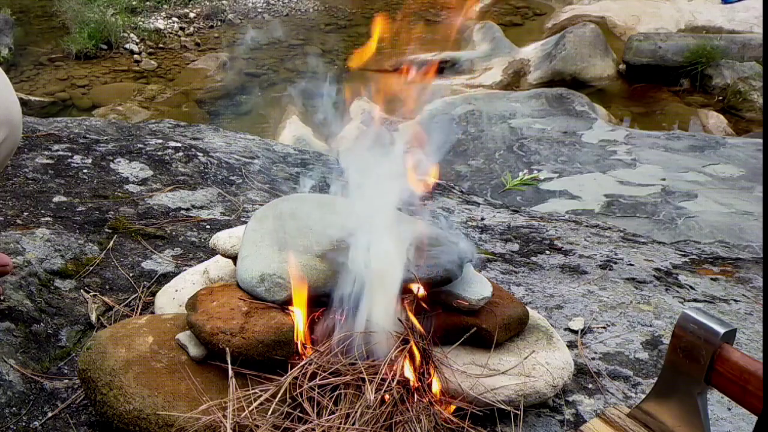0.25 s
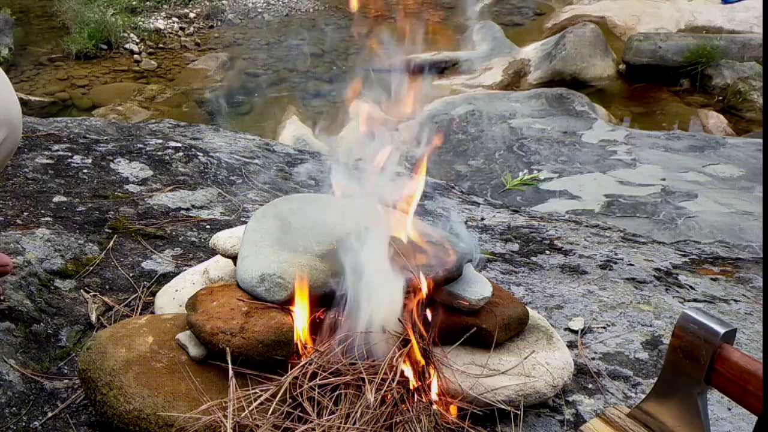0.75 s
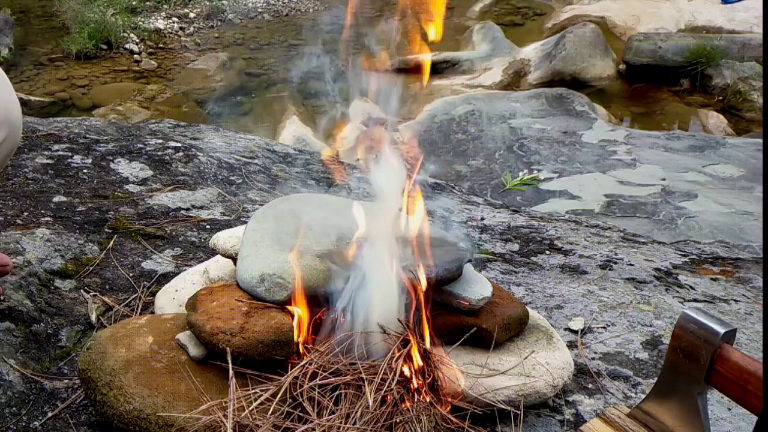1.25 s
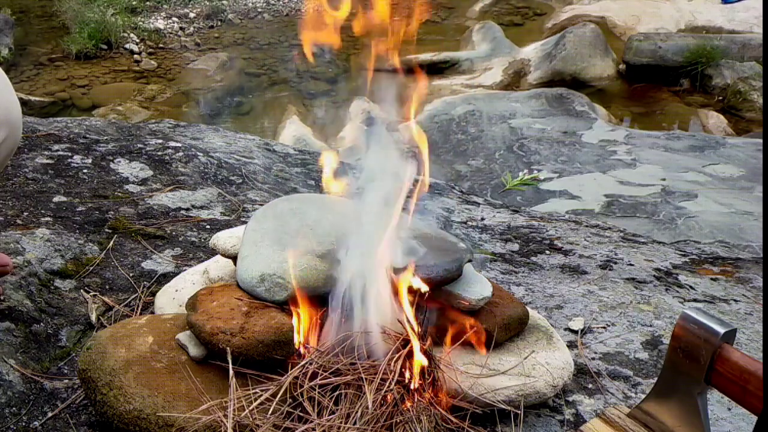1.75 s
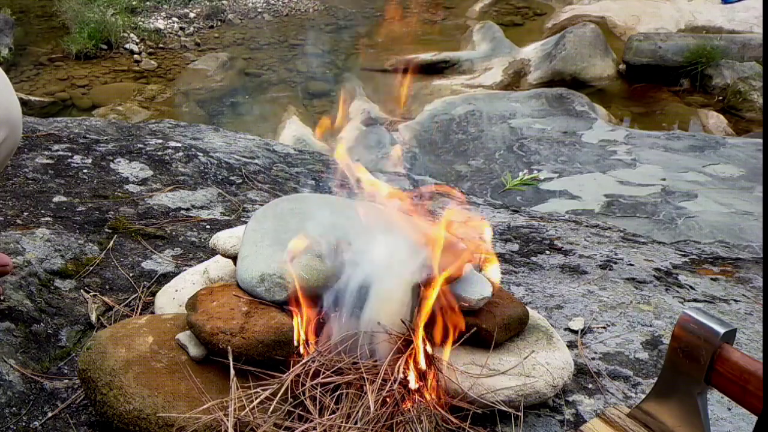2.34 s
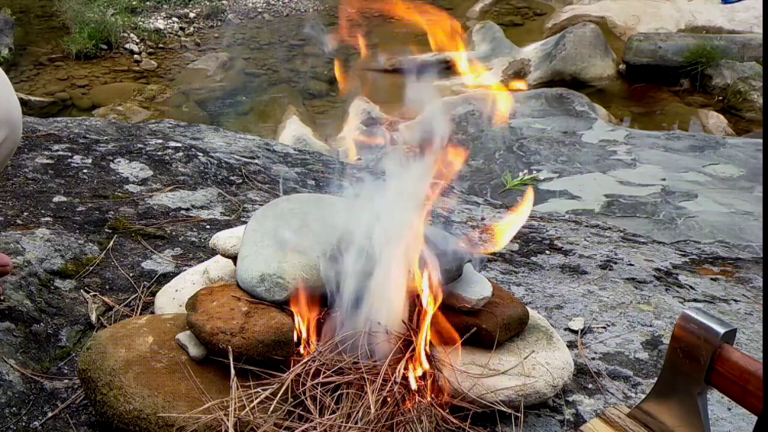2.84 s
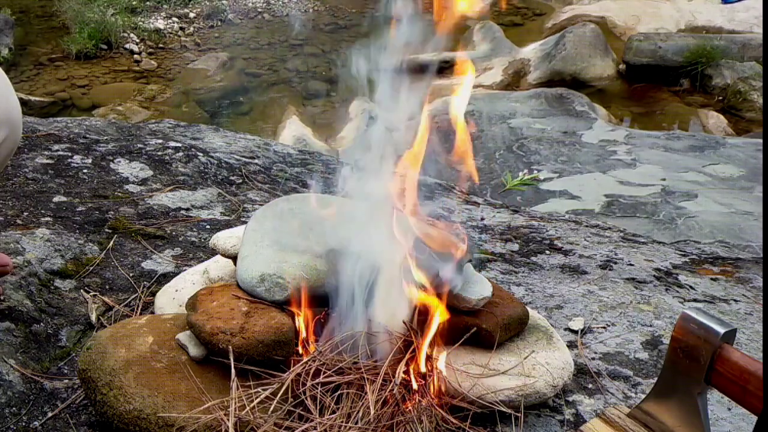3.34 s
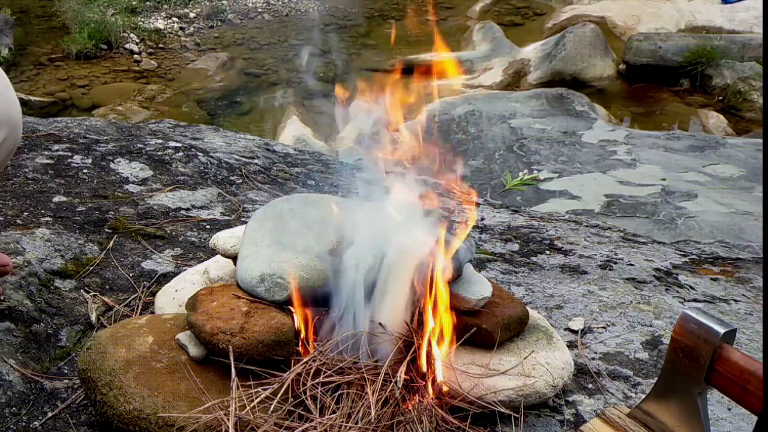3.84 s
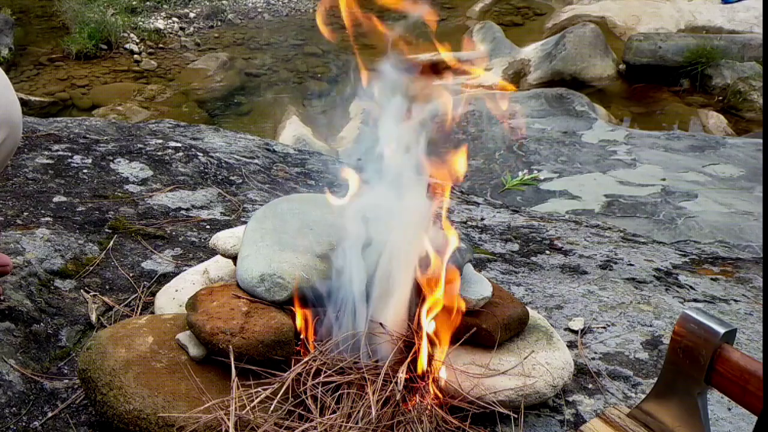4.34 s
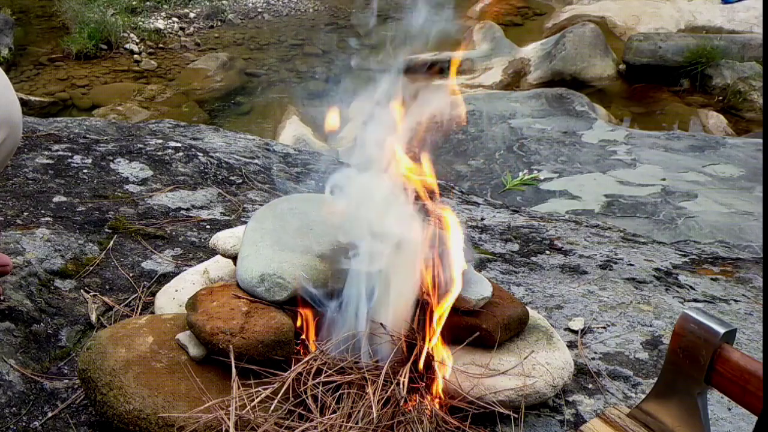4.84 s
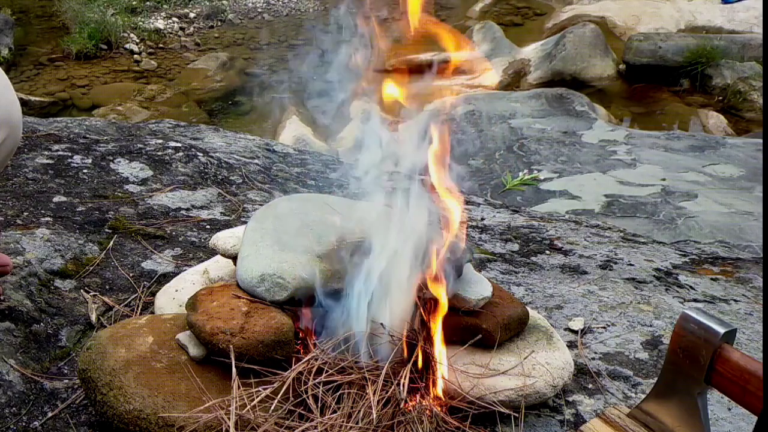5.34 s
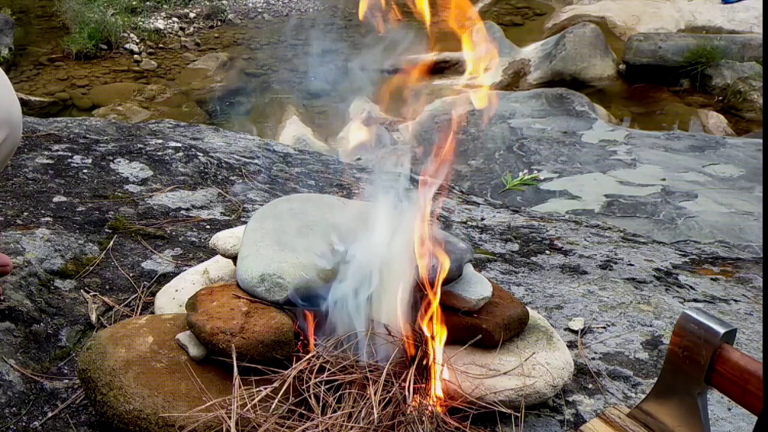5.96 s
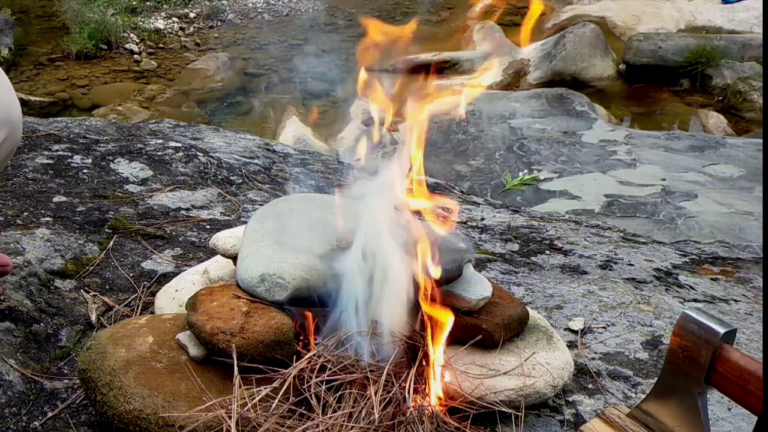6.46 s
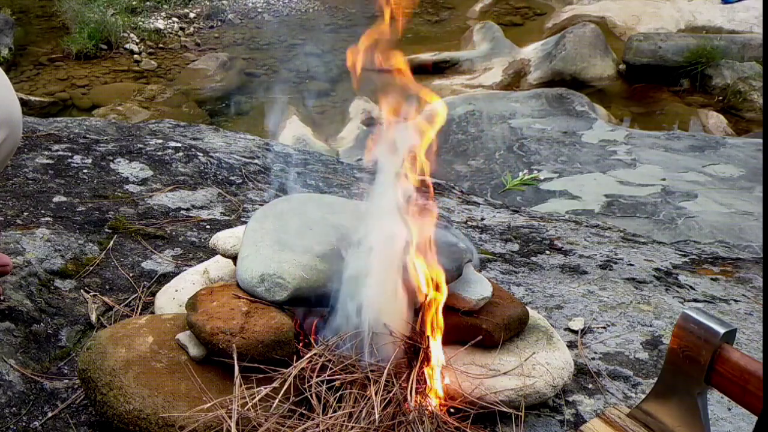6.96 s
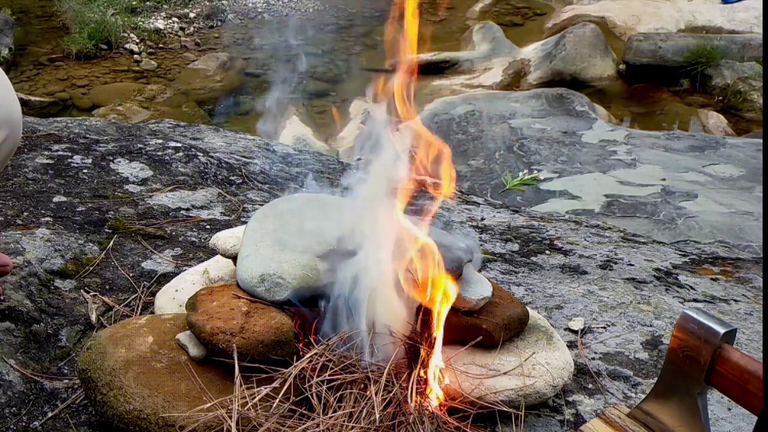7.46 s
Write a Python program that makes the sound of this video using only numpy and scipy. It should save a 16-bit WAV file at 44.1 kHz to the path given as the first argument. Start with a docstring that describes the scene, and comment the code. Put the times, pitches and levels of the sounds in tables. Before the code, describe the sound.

Close to the microphone, a small fire of dry needles snaps in sharp, dry, irregular pops with tiny clicks between them. The first second and a half is busiest, then snaps thin out, with strong isolated ones later and a loud one at the end. Sputtering sizzle and low fluttering flame puffs accompany it. Outdoors behind, a stream rushes steadily, plops hollowly near the middle, and two faint crickets sing.

```python
"""On a rock beside a stream, a small fire of dry pine needles burns under stacked stones, close to the microphone.
Bursting needles snap as short pressure pulses, and countless tiny clicks crackle between them.
Escaping vapour sizzles as sputtering bright noise; the flames rumble and flutter as low noise.
Behind, the stream rushes as babbling noise and gives a few hollow plops of ringing air.
Two faint crickets sing far off in short falling tones, one trilling and one chirping."""
import sys
import numpy as np
from scipy import signal
from scipy.fft import rfft, irfft, next_fast_len
from scipy.io import wavfile

SR = 44100
rng = np.random.default_rng(int(sys.argv[2]) if len(sys.argv) > 2 else 0)


def persist_wave(psi):
    """Save psi, clipped to +-1, as 16-bit WAV."""
    counts = np.round(np.clip(psi, -1, 1) * 32767).astype(np.int16)
    wavfile.write(sys.argv[1], SR, np.atleast_2d(counts).T)


N = 339129
TIME = np.arange(N) / SR


def undb(db):
    """Decibels to gain."""
    return 10 ** (np.asarray(db) / 20)


def unit(x):
    """Scale to rms 1."""
    return x / np.sqrt(np.mean(x ** 2))


def curve(rows):
    """Join (seconds, value) rows by straight lines."""
    return np.interp(TIME, *np.transpose(rows))


def colour(x, points):
    """Filter by a (Hz, dB) spectrum, keeping the power of white noise."""
    hz, db = np.transpose(points)
    size = next_fast_len(N + 4096)  # spare room so that tails do not wrap onto the start
    bins_hz = np.maximum(np.fft.rfftfreq(size, 1 / SR), 1)
    gain = unit(undb(np.interp(np.log(bins_hz), np.log(hz), db)))
    return irfft(rfft(x, size) * gain, size)[:N]


def noise(points):
    """Coloured noise of rms 1."""
    return unit(colour(rng.standard_normal(N), points))


def walk(rate):
    """Random wandering of rms 1, heading for `rate` new random values a second."""
    knots = rng.standard_normal(16384)
    return unit(np.interp(TIME * rate, np.arange(len(knots)), knots))


def resonance(x, hz, width_hz):
    """Two-pole band-pass with gain 1 at its centre."""
    return signal.lfilter(*signal.iirpeak(hz, hz / width_hz, fs=SR), x)


def add(out, start_s, sound):
    """Mix a short sound in at a given time."""
    i = int(np.clip(round(start_s * SR), 0, N - 1))
    out[i:i + len(sound)] += sound[:N - i]


# How hard the needles burn. Each row: time in seconds, burn strength in dB.
BURN_STRENGTH = [(0.0, -52), (0.78, -52), (1.17, -58), (1.89, -60), (2.14, -63), (2.44, -63), (2.82, -59),
                 (3.26, -62), (3.83, -61), (4.2, -64), (4.56, -62.5), (5.53, -63), (5.78, -60), (6.14, -63),
                 (6.45, -62.5), (6.64, -59), (7.25, -61), (7.55, -56.5)]
FULL_BURN_DB = -52


def burn_strength():
    """The shared heat of the fire in dB, which drives the small snaps, the crackle and the sizzle."""
    return curve(BURN_STRENGTH)


# The loud bursting needles. Each row: start in seconds, pop level in dB before trim, pop pitch in Hz,
# crack level in dB before trim, crack pitch in Hz.
LOUD_NEEDLES = [(.0267, -34.5, 895, -22, 9300), (.0601, -29, 1880, -29, 7600),
                (.107, -37, 900, -22.5, 8200), (.1247, -20, 2070, -20, 14000),
                (0.2386, -3.5, 1510, -16, 8500), (.4182, -15, 2100, -13, 9700),
                (.5093, -36, 2150, -27, 13000), (.5188, -27.5, 2000, -28, 14000),
                (.56, -32, 800, -19.5, 11300), (.601, -10, 1430, -17, 7000), (.6817, -33, 3000, -39, 14000),
                (.7194, -27.5, 1480, -19, 9700), (.797, -31.5, 1630, -24, 9900),
                (.8193, -28, 2720, -24, 12200), (0.8424, -28, 1870, -18, 10200),
                (.9327, -31, 2300, -35, 9500), (.9408, -10.5, 3260, -17.5, 14000),
                (.975, -29, 1660, -21, 9700), (1.1256, -32.5, 2470, -30.5, 9800),
                (1.3113, -33, 1940, -34, 10500), (1.3735, -26, 1300, -26, 9000),
                (1.376, -14, 1330, -13.5, 7800), (1.5074, -32.5, 1160, -20, 9300),
                (1.5595, -25.5, 2470, -28, 9600), (1.6337, -26.5, 1730, -18, 11200),
                (1.847, -29, 1890, -37, 10900), (1.939, -28, 2660, -19.5, 11400),
                (2.0854, -24.5, 1840, -34.5, 10500), (2.4157, -18, 1740, -20.5, 9000),
                (2.7892, -38, 2040, -32.5, 9700), (2.9099, -28, 2050, -22, 14000),
                (2.9424, -21, 1490, -19, 14000), (2.9985, -7, 1490, -16.5, 10000),
                (3.096, -31, 2520, -27.5, 8300), (3.3031, -26, 2300, -20.5, 14000),
                (3.3296, -26.5, 2340, -28, 7900), (3.532, -35, 1420, -25, 7700),
                (3.5641, -29, 1600, -25, 9000), (3.6439, -33, 2120, -23.5, 10200),
                (3.6649, -32, 1530, -27.5, 7900), (3.8493, -27.5, 2800, -19.5, 11900),
                (3.8686, -33, 2390, -28, 9700), (3.879, -29.5, 1000, -24.5, 11500),
                (3.9459, -32.5, 1400, -29.5, 9300), (4.0284, -33, 2230, -24, 14000),
                (4.042, -38, 2410, -29, 11700), (4.4741, -22, 1730, -24, 14000),
                (4.7163, -28.5, 1250, -15.5, 8800), (4.7251, -37, 1770, -26, 14000),
                (4.9815, -31.5, 2330, -26.5, 11000), (4.9939, -38, 1720, -36, 10500),
                (5.1477, -14.5, 1810, -17, 12600), (5.2298, -20.5, 2730, -34, 9900),
                (5.2817, -37, 900, -33.5, 10500), (5.35, -23.5, 2270, -24, 9300),
                (5.5122, -27, 2790, -29.5, 9100), (5.6911, -26, 1310, -55, 5500),
                (5.7803, -31, 2320, -23, 11800), (6.1268, -20, 1460, -16.5, 12600),
                (6.6564, -36, 1370, -17.5, 9900), (6.8338, -35, 2310, -28, 14000),
                (7.272, -32, 2340, -26.5, 9500), (7.5995, -48, 1840, -23.5, 11600),
                (7.657, -6, 1810, -18, 7700), (7.6744, -25, 1930, -44, 12000)]
# Spectrum of tearing needle walls. Each row: frequency in Hz, relative density in dB per Hz.
CRACK_SPECTRUM = [(200, -26), (1000, 2), (3000, 8.5), (5600, -5.5), (8500, 2), (12000, 0), (15500, 4)]


def snaps(burn_db, pop_db=-1.0, crack_db=0, splinter_s=0.0022, splinter_db=-2.5):
    """Each needle bursts with a pop; its wall tears with a bright crack and a spray of splinters."""
    bursts, splinters = np.zeros(N), np.zeros(N)
    t = np.arange(-128, 256) / SR
    # noise envelope around each crack: short rise, longer decay
    envelope = np.exp(-abs(t) / np.where(t < 0, splinter_s / 2, splinter_s))
    needles = list(LOUD_NEEDLES) + small_snaps(burn_db)
    grains = rng.standard_normal(size=(256, len(t)))
    for (start, db, hz, tear_db, tear_hz), grain in zip(needles, grains):
        add(bursts, start + t[0], burst(t, db + pop_db, hz, tear_db + crack_db, tear_hz))
        splinter = grain * envelope / np.linalg.norm(envelope)
        add(splinters, start + t[0], undb(tear_db + splinter_db) * splinter)
    return bursts + colour(splinters, CRACK_SPECTRUM)


def small_snaps(burn_db, rate=17, growth=1.4, loudness_growth=0.58, pop_db=-35, pop_hz=1950,
                crack_db=-32, crack_hz=11000, spread_db=2.5, spread_octaves=0.23):
    """Needle rows for the thinner ones, which burst at random, louder and more often as the burn grows."""
    heat_db = burn_db - FULL_BURN_DB
    expected = np.cumsum(rate / SR * undb(growth * heat_db))  # running count; rate is per second at full burn
    count = int(expected[-1])
    when = np.interp(np.arange(count) + rng.random(size=256)[:count], expected, TIME)
    strength_db = loudness_growth * np.interp(when, TIME, heat_db)
    rows = []
    for start, db, (a, b, c) in zip(when, strength_db, rng.standard_normal(size=(256, 3))):
        hz = pop_hz * 2 ** (spread_octaves * b)
        rows.append((start, pop_db + db + spread_db * a, hz, crack_db + db + spread_db * c, crack_hz))
    return rows


# Every pop lasts about as long, so the high ones swing more often.
POP_S, POP_MIN_CYCLES = 0.00016, 0.23


def burst(t, pop_db, pop_hz, crack_db, crack_hz, crack_cycles=0.29, crack_lag_s=.0002,
          thud_db=-19, thud_ratio=.36):
    """One needle: a pop of gas with a lower thud under it, then the bright crack of its wall."""
    cycles = max(POP_S * pop_hz, POP_MIN_CYCLES)
    thud = wavelet(t, thud_ratio * pop_hz, cycles)
    pop = wavelet(t, pop_hz, cycles) + undb(thud_db) * thud
    crack = wavelet(t - crack_lag_s, crack_hz, crack_cycles)
    return undb(pop_db) * pop + undb(crack_db) * crack


def wavelet(t, hz, cycles):
    """A short pressure wiggle of peak 1; under half a cycle long it is N-shaped."""
    wave = np.sin(2 * np.pi * hz * t) * np.exp(-(hz * t / cycles) ** 2)
    return wave / np.abs(wave).max()


# Spectrum of the sizzle and the fuller ticks. Each row: frequency in Hz, relative density in dB per Hz.
SIZZLE_SPECTRUM = [(300, -4), (1000, 0.5), (2500, 13.5), (4000, 3), (5600, -6.5), (8000, -3), (11000, 0),
                   (13500, -10), (15500, 0.5)]


def crackle(burn_db, rate=340, size_db=7.5, bunching_db=6):
    """Tiny bursts in loose bunches, more and louder as the burn grows; half are full, half thin and bright."""
    density_db = .4 * (burn_db - FULL_BURN_DB) + bunching_db * walk(25)
    hit = rng.random(N) < rate / SR * undb(density_db)  # rate is per second at full burn, before bunching
    strength_db = np.minimum(6.5 * rng.exponential(size=N), 20)
    ticks = hit * undb(strength_db + size_db + burn_db) * rng.choice([-1, 1], N)
    thin = rng.random(N) < .5
    return colour(ticks * ~thin, SIZZLE_SPECTRUM) + colour(ticks * thin, CRACK_SPECTRUM)


# Jets of vapour. Each row: start in seconds, decay time in seconds, level in dB before trim and onset.
VAPOUR_JETS = [(.452, 0.013, -42.5), (.76, .04, -51), (.93, 0.028, -44), (1.83, 0.06, -50),
               (4.02, 0.022, -58), (6.65, 0.16, -56.5), (7.566, 0.07, -38.5)]


def sizzle(burn_db, level_db=-10.5, jet_db=-2):
    """Vapour sputters out of the hot needles, now and then in a sudden jet."""
    steady = undb(burn_db + level_db + 1.4 * walk(45))
    sputter = unit(undb(4 * walk(500)))
    jets = undb(jet_db) * swells(VAPOUR_JETS, rise_s=0.00093)
    return noise(SIZZLE_SPECTRUM) * sputter * (steady + jets)


def swells(rows, rise_s):
    """Envelope of bursts that open quickly and die away exponentially."""
    out = np.zeros(N)
    for start, length, db in rows:
        age = np.maximum(TIME - start, 0)
        out += undb(db) * (1 - np.exp(-age / rise_s)) * np.exp(-age / length)
    return out


# Size of the flames. Each row: time in seconds, size in dB.
FLAME_SIZE = [(0.0, -51.5), (0.62, -54.5), (0.81, -50), (1.17, -54.5), (1.84, -52), (1.96, -51.5),
              (2.4, -50), (3.8, -54), (4.05, -55.5), (4.22, -50), (5.99, -56.5), (6.39, -57), (6.79, -53),
              (7.04, -57), (7.31, -56), (7.5, -52.5)]
# Pockets of gas catching. Each row: time of the height in seconds, bell width (one sigma) in seconds,
# rumble level in dB before trim, flapping level in dB before trim.
GAS_PUFFS = [(0.275, 0.022, -56, -51), (0.612, .025, -47.5, -60), (0.937, 0.023, -47, -53.5),
             (1.4, 0.016, -42.5, -47.5), (2.397, .035, -43.5, -66), (2.842, 0.024, -46.5, -62),
             (3.752, 0.031, -45, -55.5), (3.883, 0.0085, -41.5, -58), (4.014, 0.026, -43, -56.5),
             (4.346, 0.03, -46, -59.5), (4.747, 0.038, -46.5, -55), (5.597, 0.013, -41.5, -38.5),
             (5.655, 0.018, -43.5, -48.5), (5.909, 0.02, -46, -55.5), (6.346, 0.021, -49.5, -59),
             (6.718, 0.023, -44, -59), (6.937, 0.026, -48, -58), (7.626, 0.031, -37.5, -48)]
# Spectra of the rumble and of the flapping. Each row: frequency in Hz, relative density in dB per Hz.
RUMBLE_SPECTRUM = [(25, -60), (45, -53), (70, -8), (105, 0.5), (170, -1.5), (280, -6.5), (400, -17),
                   (800, -32.5), (2000, -79)]
FLAP_SPECTRUM = [(40, -40), (130, 0), (300, 4.5), (900, 0), (2300, -10.5), (4000, -32), (9000, -42)]


def flames(level_db=1.0, flutter_db=3.5, flap_db=-9, flap_spread_db=4.0, puff_db=-1):
    """Turbulent flames rumble and flap, both in step with their size; pockets of gas catch with a soft puff."""
    flame_db, lick = curve(FLAME_SIZE), walk(45)
    rumble = undb(flame_db + level_db + flutter_db * lick)
    flaps = undb(flame_db + flap_db + flap_spread_db * unit(lick + walk(160)))
    for height_s, length, rumble_db, flapping_db in GAS_PUFFS:
        puff = undb(puff_db) * np.exp(-((TIME - height_s) / length) ** 2 / 2)
        # independent noises add by power
        rumble = np.hypot(rumble, undb(rumble_db) * puff)
        flaps = np.hypot(flaps, undb(flapping_db) * puff)
    return noise(RUMBLE_SPECTRUM) * rumble + noise(FLAP_SPECTRUM) * flaps


def stones(x, level_db=-25, decay_s=0.01):
    """The stones and the rock scatter a very short echo, a dense burst of decaying reflections."""
    t = np.arange(SR // 10) / SR
    scatter = rng.standard_normal(len(t)) * np.exp(-t / decay_s)
    echo = signal.fftconvolve(x, scatter / np.linalg.norm(scatter))[:N]
    return x + undb(level_db) * echo


# Spectrum of the rushing water. Each row: frequency in Hz, relative density in dB per Hz.
STREAM_SPECTRUM = [(100, -17), (400, 1), (700, -1), (1300, -1), (2500, -5.5), (4300, -10.5), (5500, -20.5),
                   (9000, -19), (15000, -18.5)]


def stream(level_db=-64.0, surge_db=0.3, babble_db=2.5):
    """A steady rush whose middle range babbles band by band."""
    rush = noise(STREAM_SPECTRUM)
    babble = np.zeros(N)
    for hz in np.geomspace(450, 3600, num=4):
        babble += resonance(rush, hz, hz / 2) * (undb(babble_db * walk(18)) - 1)
    return (rush + babble) * undb(level_db + surge_db * walk(2.0))


# Hollow plops of water. Each row: start in seconds, ring level in dB before onset and decay,
# starting pitch in Hz, time in seconds to ring down by 60 dB, splash level in dB relative to the ring.
WATER_PLOPS = [(2.668, -38.5, 430, 0.072, -15), (2.683, -31.5, 548, 0.078, -15),
               (2.7003, -19, 630, 0.024, -16), (2.708, -14, 850, 0.026, -13), (2.717, -27, 653, 0.027, -29),
               (2.849, -36, 890, 0.026, -14), (3.054, -28, 644, 0.032, -18), (3.064, -29, 695, 0.017, -22)]


def plops(level_db=0, rise_s=0.00063, glide=2.3, overtone=2.79, overtone_db=-15, splash_s=0.0033):
    """Pockets of air ring briefly in the water, rising a little in pitch, each opened by a dull splash."""
    out, t = np.zeros(N), np.arange(SR // 10) / SR
    for start, db, hz, t60, splash_db in WATER_PLOPS:
        phase = 2 * np.pi * hz * t * (1 + glide * t)
        fade = np.exp(-np.log(1000) * t / t60)
        ring = np.sin(phase) * fade
        ring += undb(overtone_db) * np.sin(overtone * phase) * fade ** 2  # the overtone dies twice as fast
        splash = unit(resonance(resonance(rng.standard_normal(len(t)), 830, 1040), 830, 1040))
        sound = ring + undb(splash_db) * splash * np.exp(-t / splash_s)
        onset = 1 - np.exp(-(t / rise_s) ** 2)
        add(out, start, undb(db + level_db) * sound * onset)
    return out


# Far crickets. Each row: time in seconds, level of the trilling one in dB, level of the chirping one in dB,
# both before wavering and echo.
CRICKET_LEVELS = [(0, -73, -73), (3.6, -71, -70), (4.3, -68, -68), (6.4, -69, -70), (6.8, -75, -72),
                  (7.69, -75, -75)]


def crickets(chirp_period_s=.2235, first_chirp_s=0.17, chirp_share=0.45):
    """One cricket trills on and on; a higher one chirps in groups of about five strokes; the rocks blur both."""
    levels = np.array(CRICKET_LEVELS)
    trill_db = curve(levels[:, [0, 1]]) + 2 * walk(40)
    chirp_db = curve(levels[:, [0, 2]]) + 2 * walk(40)
    # 22 and 50 wing strokes a second, a little uneven
    trill = wing_strokes(22 * TIME + .15 * walk(4), hz=3820, fall_hz=180, duty=.6)
    group = ((TIME - first_chirp_s) / chirp_period_s + 0.04 * walk(4.32)) % 1
    gate = np.sqrt(np.abs(np.sin(np.pi * np.minimum(group / chirp_share, 1))))
    chirps = wing_strokes(50 * TIME + 0.22 * walk(4.7), hz=4680, fall_hz=265, duty=0.69) * gate
    return stones(trill * undb(trill_db) + chirps * undb(chirp_db), level_db=-7, decay_s=.03)


def wing_strokes(cycles, hz, fall_hz, duty):
    """Each closing of a cricket's wings sounds one short tone that falls in pitch."""
    stroke = np.minimum(cycles % 1 / duty, 1)  # runs 0 to 1 while the wings close, then rests
    pitch_hz = hz + fall_hz * (.5 - stroke) + 15 * walk(30)
    return np.sin(np.pi * stroke) * np.sin(2 * np.pi * np.cumsum(pitch_hz) / SR)


def scene():
    """The fire in its stone hearth, with the stream and the crickets behind."""
    burn_db = burn_strength()
    fire = stones(snaps(burn_db) + crackle(burn_db)) + sizzle(burn_db) + flames()
    return (fire + stream() + plops() + crickets())[None]


def record(dry, port_hz=8600, port_width_hz=1500, port_db=11, top_hz=15450):
    """The microphone port rings in the treble, clicks linger in two narrow bands, and the top is cut steeply."""
    x = dry + undb(port_db) * resonance(dry, port_hz, port_width_hz)
    x = x - 2 * resonance(x, 4020, 270)  # all-pass: delays this band without changing its level
    x = x - 1.47 * resonance(x, 7870, 240)  # delays this band and dips it
    return signal.sosfilt(signal.ellip(8, .2, 70, top_hz, fs=SR, output="sos"), x)


dry = scene()
out = record(dry)
persist_wave(out)
```